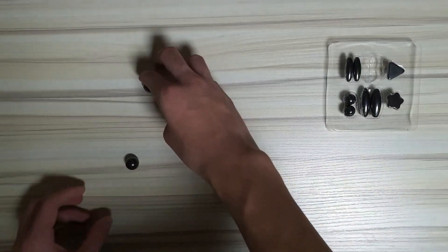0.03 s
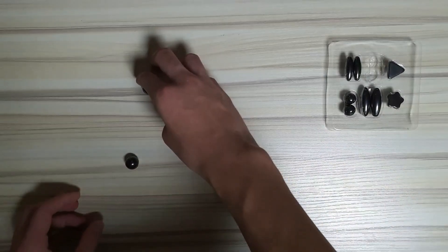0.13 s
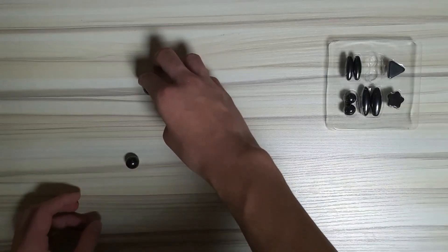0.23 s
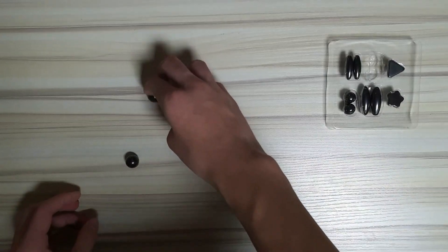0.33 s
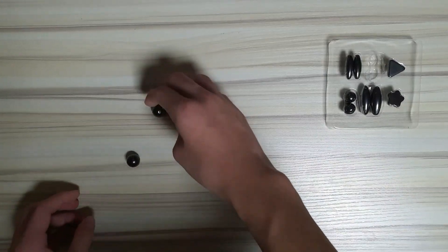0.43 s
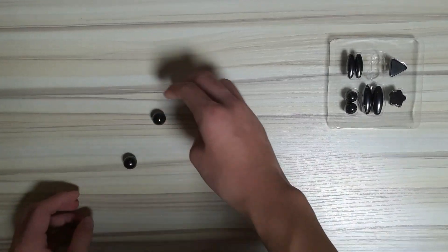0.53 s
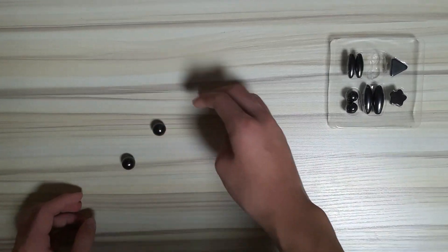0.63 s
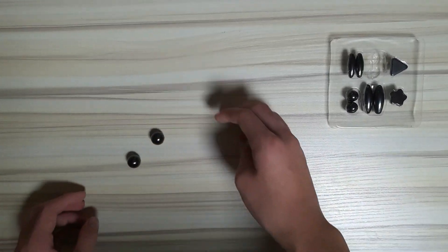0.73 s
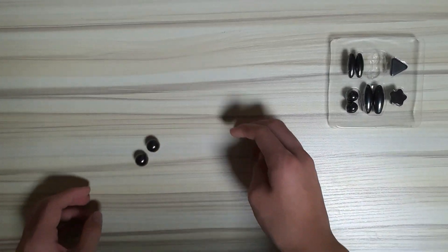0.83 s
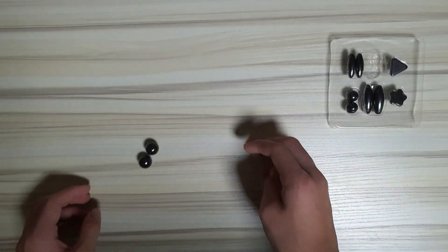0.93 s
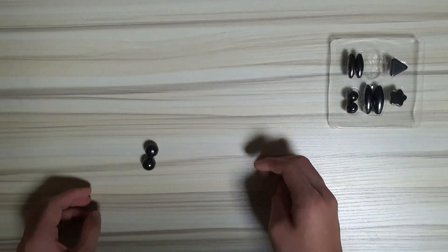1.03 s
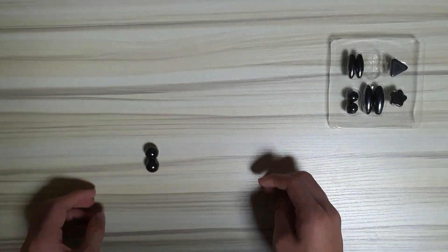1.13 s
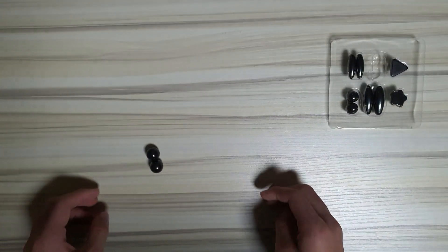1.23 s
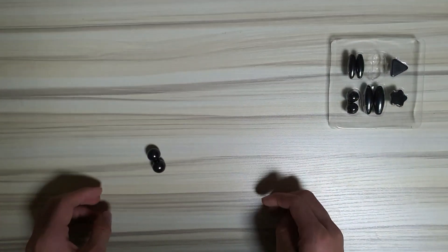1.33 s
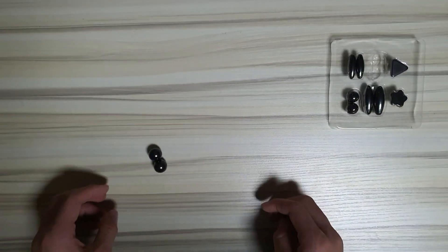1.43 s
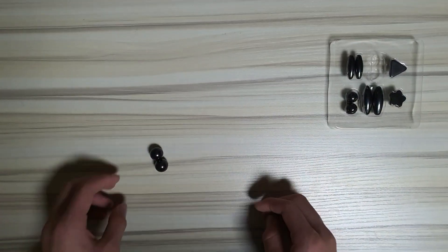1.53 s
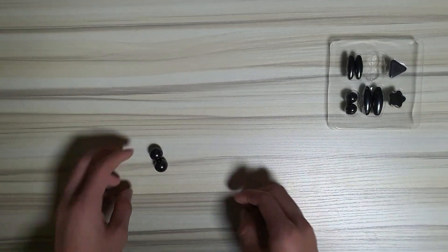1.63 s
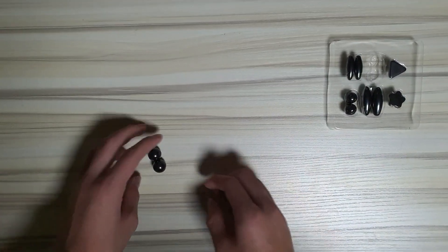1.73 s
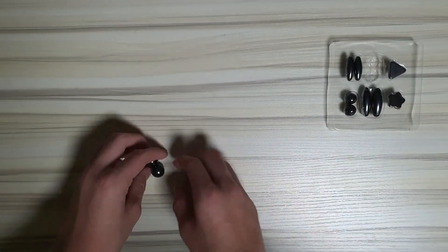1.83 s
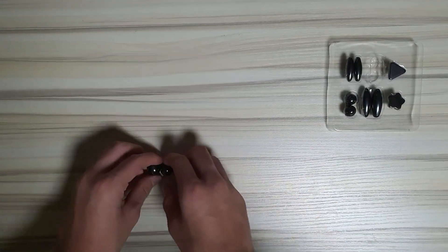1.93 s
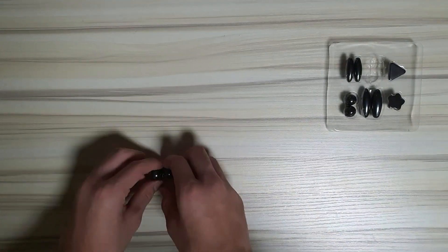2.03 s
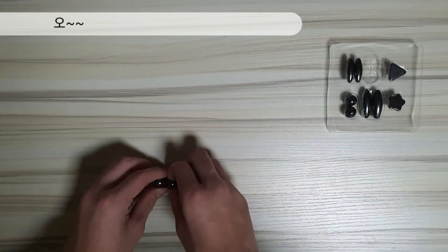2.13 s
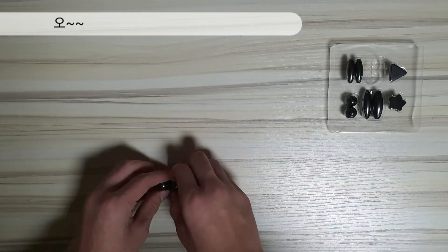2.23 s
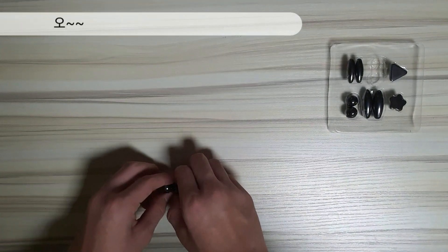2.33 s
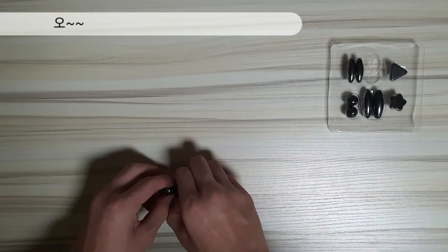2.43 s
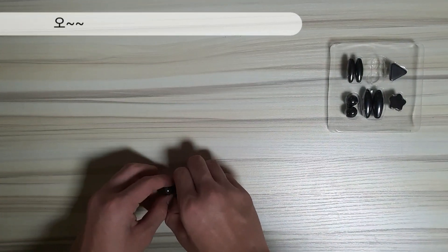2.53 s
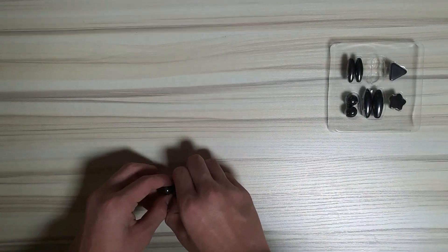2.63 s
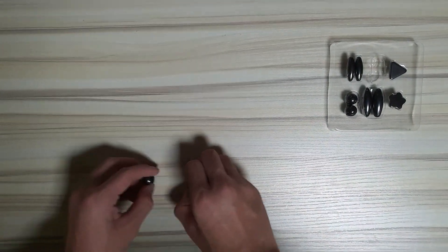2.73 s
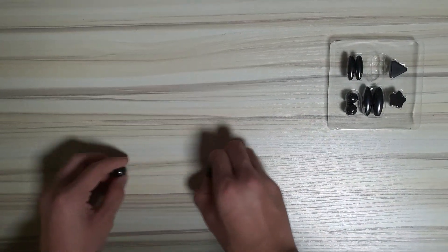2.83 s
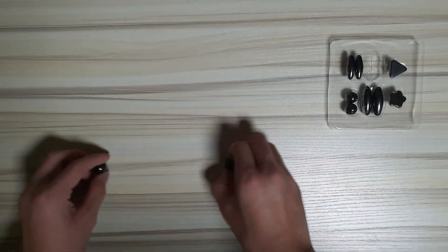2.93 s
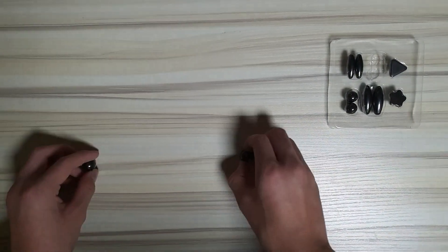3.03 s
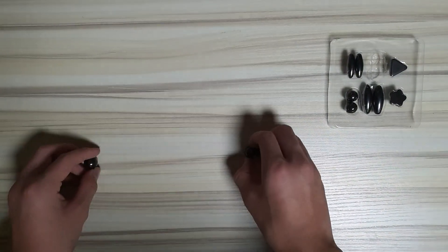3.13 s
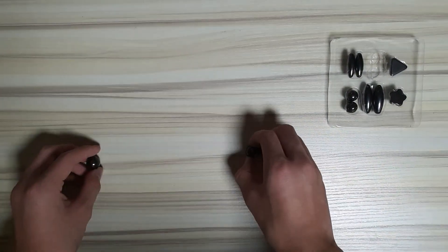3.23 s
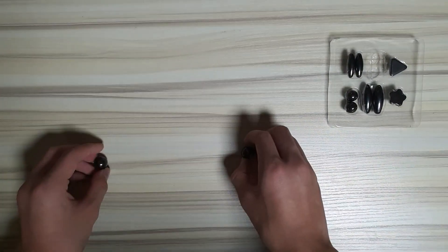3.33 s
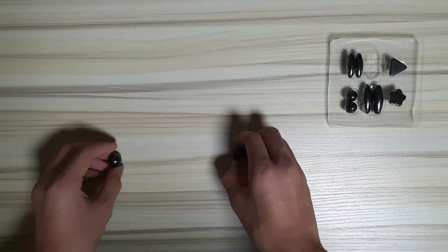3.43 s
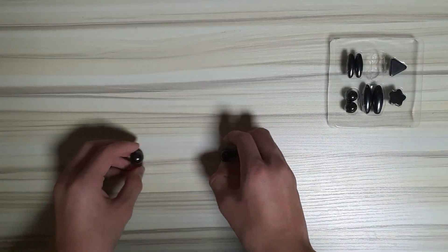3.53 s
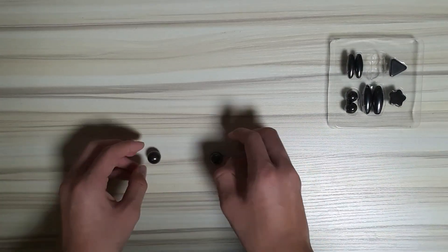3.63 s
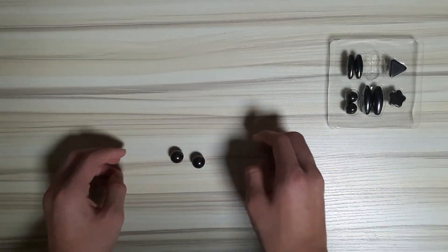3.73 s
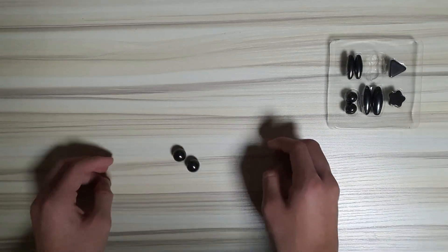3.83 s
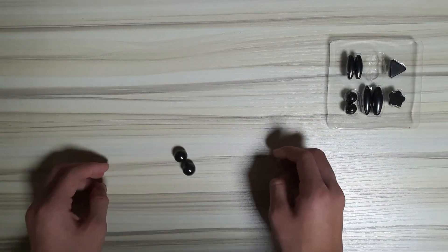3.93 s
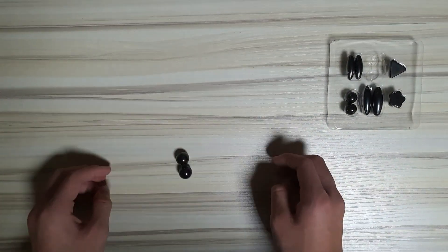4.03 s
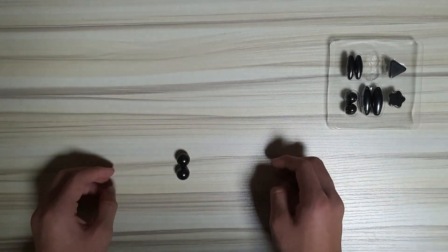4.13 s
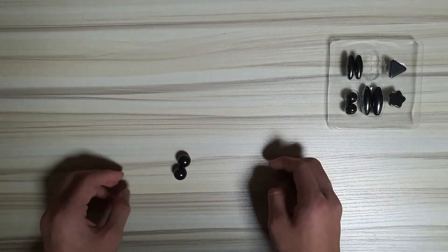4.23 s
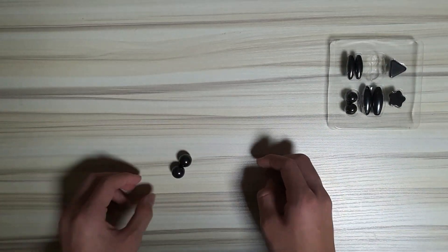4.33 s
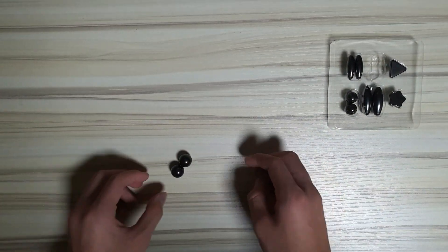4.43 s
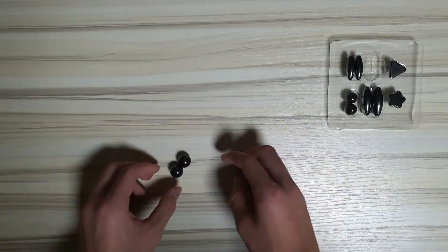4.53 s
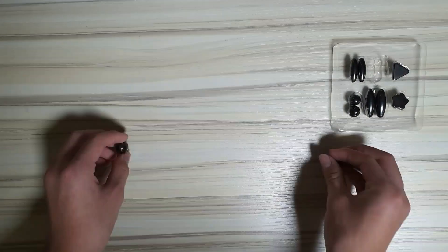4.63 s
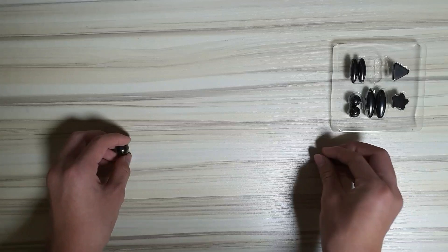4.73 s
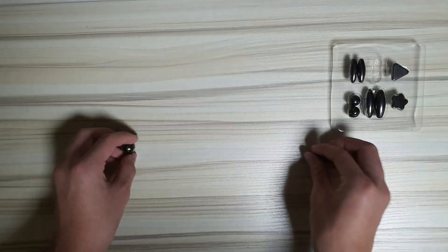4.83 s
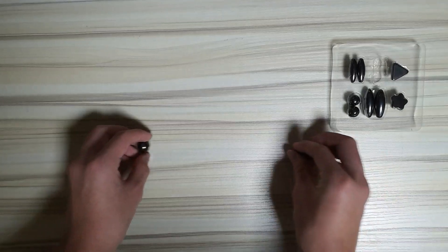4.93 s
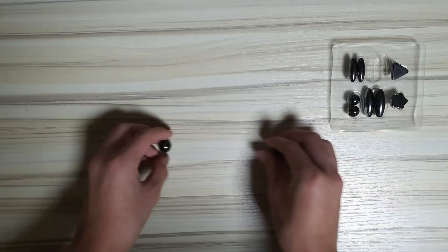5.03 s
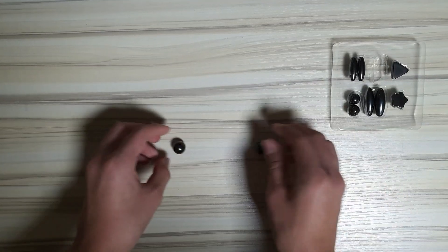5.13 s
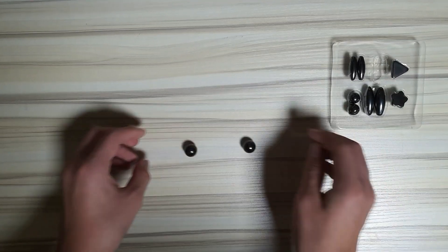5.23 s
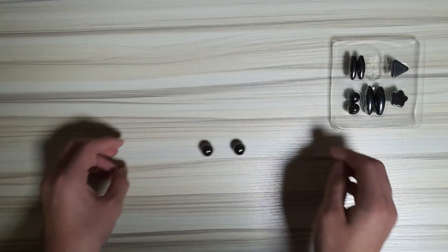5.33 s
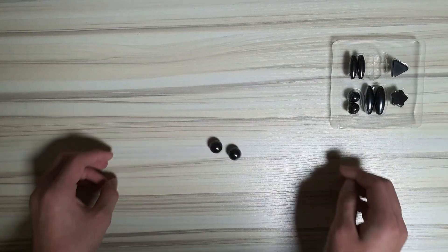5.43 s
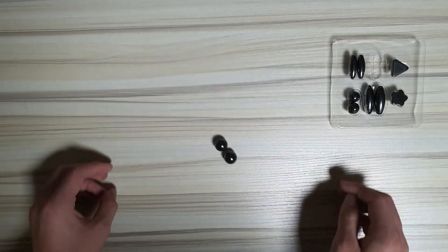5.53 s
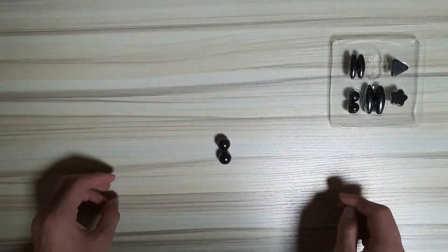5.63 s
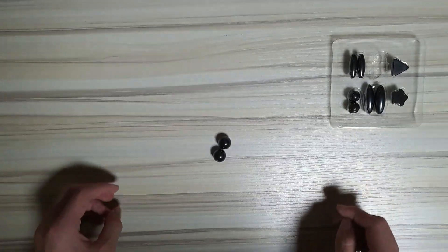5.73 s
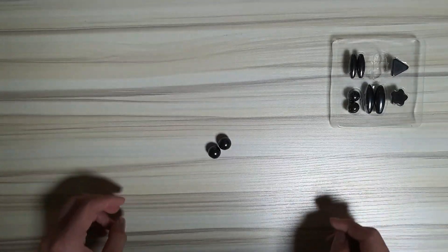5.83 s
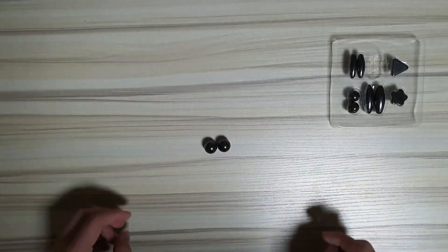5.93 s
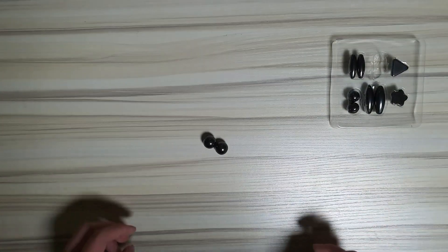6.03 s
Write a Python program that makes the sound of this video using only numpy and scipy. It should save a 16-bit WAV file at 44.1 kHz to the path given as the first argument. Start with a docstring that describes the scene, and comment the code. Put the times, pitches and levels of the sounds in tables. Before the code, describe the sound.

A small, bare, quiet room, heard close over a wooden table. From 0 to 0.6 seconds, skin brushes and fingertip scuffs sound on the wood. At about 0.65 a magnet rolls with small dull knocks; from 0.93 hard, bright clacks come ever faster, merging into a rising buzz that weakens and stops around 1.4. Soft rubs follow at 1.9 to 2.3, a very faint, thin squeak near 2.6, a knock at 2.8 and more hand sliding to 3.4. At 3.55 a knock and rolling start the second throw; clacks from 3.88 tighten into another buzz until about 4.5. Knocks and a soft rising rub follow, with a momentary dip at 4.76. A firm knock at 5.15 starts the third throw: rolling, clacks from 5.5, then a brighter buzz with a narrow ringing tone, climbing to the end just after 6.

```python
"""In a small, bare room, two polished oval magnets are tossed three times onto a wooden table.
Bursts of noise make the clacks: the pair rebounds ever faster until they merge into a rising buzz.
Noise and tiny bumps fed through the resonances of the wood make the rolls, knocks and sliding hands.
Between throws, hands pick the pair up and pull it apart, with soft rubs and a faint squeak."""
import sys
import numpy as np
from scipy import signal
from scipy.fft import rfft, irfft
from scipy.io import wavfile

SR = 44100
rng = np.random.default_rng(int(sys.argv[2]) if len(sys.argv) > 2 else 0)


def unload_wav(signal):
    """Save mono or channel-first audio to the path in sys.argv[1] as 16-bit WAV at rate SR, clipped to [-1, 1]."""
    wavfile.write(
        sys.argv[1],
        SR,
        np.round(np.clip(np.atleast_2d(signal).T, -1, 1) * 32767).astype(np.int16),
    )


N = 268304
MS = 1e-3  # one millisecond, in seconds
TAPS = 8192  # length of the long filters, in samples
HZ = np.fft.rfftfreq(TAPS, 1 / SR)
TIME = np.arange(N) / SR

# How the table top answers hard contact, without its sharp resonances.
# Each row: frequency in Hz, level in dB.
WOOD = [(15, -63.5), (25, -25), (60, -18.5), (139, -22), (286, -6.5), (438, -7.5), (529, -5), (879, -8.5),
        (978, -7.5), (1060, -9.5), (1390, -9.5), (2130, -7.5), (3930, -28.5), (7090, -33), (15000, -57.5)]
# How the table top answers soft skin. Each row: frequency in Hz, level in dB.
SKIN = [(24, -62.5), (40, -18.5), (169, -18.5), (313, -3), (466, -6), (541, 0.5), (866, -5.5), (980, -9.5),
        (1390, -16.5), (1570, -12), (1820, -18.5), (2450, -21.5), (3220, -32), (6780, -45.5),
        (15000, -64.5)]


def gain_of(db):
    """Turns decibels into a factor."""
    return 10 ** (np.asarray(db) / 20)


def evened(x):
    """Scales a sound to an average (rms) level of 1."""
    return x / np.sqrt(np.mean(x ** 2) + 1e-20)


def read(points, hz):
    """Reads a table between its points, on a log-frequency axis."""
    f, value = np.transpose(points)
    return np.interp(np.log(hz + 1), np.log(f + 1), value)


def through(x, response):
    """Sends a sound through a response (convolution) and keeps at most the scene's length."""
    return signal.fftconvolve(np.atleast_2d(x), np.atleast_2d(response), axes=1)[:, :N]


def band(x, hz, kind, order=2):
    """Keeps only part of the frequencies (Butterworth filter)."""
    return signal.sosfilt(signal.butter(order, hz, kind, fs=SR, output="sos"), x)


def peaks(rows):
    """Adds up resonance humps in dB, each given as (Hz, width in Hz, dB)."""
    return sum(db / (1 + (2 * (HZ - hz) / width) ** 2) for hz, width, db in rows)


def ringing(db):
    """Makes a response of energy 1 that starts at once and has the given spectrum."""
    log_gain = np.log(gain_of(np.maximum(db, -100)))
    mirrored = np.r_[log_gain, log_gain[-2:0:-1]]
    response = np.fft.ifft(np.exp(np.conj(signal.hilbert(mirrored)))).real
    return response / np.linalg.norm(response)


def colourless(ring):
    """Keeps only the delays of a response: it spreads a click in time without colouring it."""
    size = ring.shape[-1]
    angle = np.angle(np.fft.rfft(ring, 2 * size))
    spread = np.fft.irfft(np.exp(1j * angle))[..., :size]
    return spread / np.linalg.norm(spread, axis=-1, keepdims=True)


def impulses(times, sizes):
    """Places smooth, band-limited impulses at exact times between samples."""
    out, at = np.zeros(N), np.asarray(times)[:, None] * SR
    index = at.astype(int) + np.arange(-8, 9)
    pulses = np.asarray(sizes)[:, None] * np.sinc(index - at)
    np.add.at(out, np.clip(index, 0, N - 1), pulses)
    return out


def wander(size, step_s):
    """Draws a slow random curve, with a new value every step and straight lines between."""
    at = np.arange(size) / SR / step_s
    return np.interp(at, np.arange(256), rng.standard_normal(256))


def add(mix, s, sound):
    """Mixes a sound in at time s."""
    at = round(s * SR)
    sound = sound[:, max(-at, 0):]
    part = mix[:, max(at, 0):][:, :sound.shape[1]]
    part += sound[:, :part.shape[1]]


def room(x, wet_db, echo_db, smear_ms, direct=1):
    """Adds a few slightly smeared reflections and a diffuse tail; the bass is much alike in both ears."""
    # Early reflections. Each row: delay in ms, left level in dB, right level in dB, before echo_db.
    echoes = [(1.2, -6, -12), (2.1, -9, -8), (5.3, -13, -7), (6.3, -2.5, -9), (8.8, -9, -14),
              (11.6, -5, -6), (16.6, -12, -12), (23, -13, -13)]
    # How fast the tail fades. Each row: frequency in Hz, time to fall by 60 dB in seconds.
    fade_times = [(200, 0.25), (530, 0.17), (1400, 0.19), (3700, 0.21), (8000, 0.26), (16000, 0.19)]
    # How alike the tail is in both ears. Each row: frequency in Hz, likeness from -1 to 1.
    likeness = [(100, 0.87), (350, 0.99), (600, 0.85), (1000, -0.35), (2000, 0.16), (4000, 0.035),
                (16000, 0.69)]
    t = np.arange(SR // 2) / SR
    hz, frames, z = signal.stft(rng.standard_normal((2, len(t))), SR, nperseg=256)
    same = np.clip(read(likeness, hz), -1, 1)[:, None]
    z[1] = same * z[0] + np.sqrt(1 - same ** 2) * z[1]
    fade_db = -60 * frames / read(fade_times, hz)[:, None]
    tail = signal.istft(z * gain_of(fade_db), SR, nperseg=256)[1][:, :len(t)]
    tail *= 1 - np.exp(-t / 0.0044)  # the tail builds up over a few ms
    response = gain_of(wet_db) * tail / np.linalg.norm(tail[0])
    smear = np.exp(-t[:256] / (smear_ms * MS))
    for ms, *ears_db in echoes:
        smeared = colourless(rng.standard_normal((2, len(smear))) * smear)
        echo = band(smeared, 850, "highpass", order=1)
        place = response[:, round(ms * MS * SR):][:, :len(smear)]
        place += gain_of(np.c_[ears_db] + echo_db) * echo
    response[:, :np.size(direct)] += direct
    return through(x, response / np.linalg.norm(response[0]))


def wood(contact, place, ring=1.0, chance_db=1.5):
    """Response of the table top; each place on it favours other resonances, and a hand damps them."""
    # Resonances of the board, before the ring factor and a small random change.
    # Each row: frequency in Hz, width in Hz, height in dB.
    board_modes = [(204, 7, 13), (272.5, 16, 6.6), (316, 83, 5.7), (370, 23, 3.1), (523.9, 16, 7),
                   (557, 24, 11.9), (984.6, 44, 14.1), (1157.4, 52, 5.5), (1285, 26, 8), (1498.4, 55, 11.8),
                   (1650, 80, 3.5), (2098.4, 45, 10.9), (2145, 66, 3), (2510, 70, 1.7)]
    # Main resonances that depend on the place of contact. Each row: frequency in Hz, width in Hz.
    place_bands = [(550, 80), (985, 69), (1520, 110), (2130, 130)]
    modes = peaks((hz, width, db + chance_db * rng.standard_normal()) for hz, width, db in board_modes)
    favoured = peaks((hz, width, db) for (hz, width), db in zip(place_bands, place))
    return ringing(read(contact, HZ) + ring * modes + favoured)


def scatter(x, ring_ms=9, size=2048):
    """Bending waves cross the board and return from its edges, drawing a blow out into a dense ring."""
    fade = np.exp(-np.arange(size) / SR / (ring_ms * MS))
    return through(x, colourless(rng.standard_normal(size) * fade))


def friction(motions, contact, ring, bumps_per_s, grit, low_db, high_db):
    """Motion feeds tiny bumps and fine grit into the wood; level and ring shift from patch to patch."""
    split_hz, wide_hz, bass_hz = 1200, 800, 420
    patch_s, bump_s, bump_db = .06, .02, 1.6
    bumps = (rng.random(N) < bumps_per_s / SR) * rng.uniform(.5, 1, N) * rng.choice([-1, 1], N)
    force = evened(bumps) + grit * rng.standard_normal(N)
    # the bass comes straight from the board; higher up the room adds its reflections
    straight = band(force, wide_hz, "lowpass", order=4)
    upper = band(force, wide_hz, "highpass", order=4)
    drive = straight + room(upper, wet_db=13.0, echo_db=-2.5, smear_ms=0.061)
    bass_filter = signal.butter(3, bass_hz, fs=SR, output="sos")
    out = np.zeros((2, N))
    for start, level, bright_db, bass_db, place in motions:
        # each motion crosses another stretch of the grain
        at, size = rng.integers(N - 2 * SR), len(level)
        stretch = drive[:, at:at + TAPS + size]
        here, there = (through(stretch, wood(contact, place, ring))[:, TAPS:TAPS + size] for _ in range(2))
        share = (1 + np.tanh(2 * wander(size, patch_s))) / 2
        top = here + (there - here) * share
        low = evened(band(top, split_hz, "lowpass", order=4))
        high = evened(band(top, split_hz, "highpass", order=4))
        low = low + (gain_of(bass_db) - 1) * signal.sosfiltfilt(bass_filter, low)
        uneven = gain_of(bump_db * wander(size, bump_s))
        both = gain_of(low_db) * low + gain_of(high_db + bright_db) * high
        add(out, start, level * uneven * both)
    return out


def quiet(apart=0.98, level_db=-74):
    """Faint steady background of the room: shaped noise that differs partly between the ears."""
    # Shape of its spectrum. Each row: frequency in Hz, relative level in dB.
    hush = [(25, -22), (55, -8), (110, -15), (220, -16.5), (660, -29.5), (2100, -37), (3000, -39),
            (3520, -31), (4100, -40), (5000, -41), (16000, -45)]
    noise = apart * rng.standard_normal((2, N)) + rng.standard_normal(N)
    return gain_of(level_db) * evened(through(noise, ringing(read(hush, HZ))))


def squeak(waver_hz=45, squeak_db=-4):
    """A faint thin squeak while the fingers strain at the pair: one gliding, wavering line."""
    # Path of the squeak, before the waver and the shared squeak_db.
    # Each row: time in seconds, frequency in Hz, level in dB.
    path = [(2.51, 9450, -95), (2.56, 9800, -77), (2.61, 9980, -73), (2.645, 9880, -75.5),
            (2.665, 10020, -80), (2.705, 10100, -80), (2.73, 9820, -72), (2.76, 9600, -92)]
    s, hz, db = np.transpose(path)
    t = np.arange(s[0], s[-1], 1 / SR)
    turns = np.cumsum(np.interp(t, s, hz) + waver_hz * wander(len(t), .004)) / SR
    level = gain_of(squeak_db + np.interp(t, s, db))
    out = np.zeros((1, N))
    add(out, s[0], (level * evened(np.sin(2 * np.pi * turns)))[None])
    return out


def drags(width_hz=170):
    """A fingertip drags: skin slips at a loosely held rate that climbs as the finger tightens."""
    # Soft rising rubs. Each row: start in seconds, length in seconds, first slip rate in Hz,
    # last slip rate in Hz, level in dB before the swell and the room.
    rubs = [(3.364, .07, 835, 1150, -57), (4.911, 0.097, 698, 839, -44)]
    out = np.zeros((1, N))
    for start, length, first_hz, last_hz, db in rubs:
        size = round(length * SR)
        slips = evened(band(rng.standard_normal(SR), width_hz, "lowpass")[-size:])
        turns = np.cumsum(np.linspace(first_hz, last_hz, size)) / SR
        tone = evened(slips * np.sin(2 * np.pi * turns))
        add(out, start, (gain_of(db) * np.hanning(size) * tone)[None])
    return room(out, wet_db=-5, echo_db=-3, smear_ms=1.0)


def touches(touch_db=-10):
    """Soft fingertips load the table gradually: a short scuff that swells and dies."""
    # Each row: start in seconds, peak level in dB before touch_db, treble in dB against the peak,
    # time to swell in ms.
    fingers = [(0.432, -24, -44, 8), (0.478, -17.5, -33, 8), (1.907, -33, 1, 30.6), (2.233, -29, -25.5, 5)]
    scuff_colour = [(300, -13.0), (2000, 0.5), (4000, -10.5), (9000, -20.0), (15000, -40.0)]  # (Hz, dB)
    push, scuff = np.zeros(N), np.zeros(N)
    for s, db, treble_db, swell_ms in fingers:
        age = np.maximum(TIME - s, 0) / (swell_ms * MS)
        swell = (age * np.exp(1 - np.minimum(age, 60))) ** 2
        force = gain_of(db + touch_db) * swell * rng.standard_normal(N)
        push, scuff = push + force, scuff + gain_of(treble_db) * force
    board = through(push, wood(SKIN, place=(3, -3, 4, -2)))
    sound = board + through(scuff, ringing(read(scuff_colour, HZ)))
    return room(sound, wet_db=2, echo_db=2.0, smear_ms=0.93)


def stroke(start, length, db, bright_db, bass_db, *place):
    """A hand speeds up and slows down in one arch; table and room hold the sound a little longer."""
    tail_s, arch, t60_s = .3, .55, 0.31  # extra time, how pointed the swell is, how long it rings on
    t = np.arange(0, length + tail_s, 1 / SR)
    speed = np.maximum(np.sin(np.pi * np.minimum(t / length, 1)), 0) ** arch
    keep = gain_of(-60 / (t60_s * SR)) ** 2
    energy = signal.lfilter([1 - keep], [1, -keep], speed ** 2)
    return start, gain_of(db) * np.sqrt(energy), bright_db, bass_db, place


def rubbing():
    """Hands stroke the table: skin slides over it in many fine slips."""
    # Each row: start in seconds, length in seconds, level in dB before the friction settings,
    # brightness in dB, bass in dB, then height in dB of each of the four place bands.
    hand_strokes = [(-0.06, 0.16, -34, -2, -2.5, 1.5, 0, 5.5, -4),
                    (0.181, 0.045, -44.5, -4.5, -8, 2, -12, -1, -2),
                    (0.252, 0.079, -59.5, -26, 2, 2.0, -1.0, -1.0, -4.0),
                    (0.374, 0.055, -51.5, -24, -26, -2, -6.0, 6, 1.0),
                    (0.425, 0.055, -36, -6.5, -18, -1, 2.0, 5, 10),
                    (0.468, 0.05, -31, 2, -2.5, 2, 1.5, 3.5, 8),
                    (0.535, 0.18, -49, -12, -4, 2, -5.0, 2.5, -1.0),
                    (1.849, 0.1, -68, 6, 15, -2.0, -1.0, 5.0, 0.0),
                    (1.897, 0.084, -57.5, 5, -2, -2.0, -2.0, 5.0, 0.0),
                    (1.974, 0.073, -40.5, 8.5, 10.5, -2.0, 4.5, 2, -3.0),
                    (2.05, 0.061, -44, -12, 6.5, 1.0, 1.0, 3.0, -3.0),
                    (2.151, 0.11, -43.5, -11, 0.5, 3.5, -1.0, 3.0, -6),
                    (2.41, 0.049, -59.5, -15, 4.5, 5.0, -4.0, 9.0, -2.0),
                    (2.852, 0.17, -42.5, 3.5, -4, 0.5, -2, 3, -2),
                    (2.933, 0.18, -34.5, 5.5, 1.5, -0.5, -4.0, 1.0, -4.0),
                    (3.228, 0.071, -52.5, -13.5, -3.5, -1, -4.0, -1.0, -3.0),
                    (3.405, 0.2, -44.5, -10.5, -3.5, 0.0, -1, -1.0, -2.0),
                    (4.899, 0.13, -47.5, 3.5, 1, -2.0, -1.5, -2, -3.0)]
    motions = [stroke(*row) for row in hand_strokes]
    return friction(motions, SKIN, ring=0.81, bumps_per_s=710, grit=0.79, low_db=-2.0, high_db=-5.5)


def knocks(knock_db=17.0, bounce_ms=12, bounce_db=-9, count=3):
    """A magnet hits the table, with a few small bounces and a tick of contact; soft bumps lack treble."""
    # Each row: start in seconds, peak level in dB before knock_db, treble in dB against the peak,
    # hardness as top frequency in Hz, then height in dB of each of the four place bands.
    hits = [(0.651, -22.5, -38, 1800, 3.5, -6.0, -1.0, 3), (0.708, -23, -41, 1200, 2.0, -4.0, 2.0, -1.0),
            (0.737, -23.5, -29, 1800, 4, 1.0, 1.0, -2.0), (0.866, -24.5, -27, 3000, -5.0, -2, 2.0, -3),
            (2.803, -13.5, -11.5, 7050, 2.0, -13.5, -3.0, 2.5),
            (3.55, -12, -20.5, 7000, -2, -0.5, -2, -1.0), (3.749, -16, -2.5, 9000, -3, -1, 6, -1),
            (3.904, -14, 0.5, 9000, 2.0, -3, 2, 2), (3.907, -12, 5, 9000, 2, -3.0, 3.0, 4),
            (4.56, -12.5, -11, 9000, -2.0, -1.5, 3.0, 0.5), (4.59, -15, -8, 9000, -2.0, 4, 2.0, -1.0),
            (4.831, -13.5, -30.5, 6970, -1.5, -2.5, -2, -1),
            (5.148, -7.5, -3.5, 9000, -5.5, -1.0, 1.0, 1.0), (5.512, -11.5, -9, 9000, -3, -8, 3.0, -0.5),
            (5.754, -8.5, -2, 9000, -4.5, -6, 4, -1)]
    # Colour of the contact tick. Each row: frequency in Hz, relative level in dB.
    tick_colour = [(300, -27), (1500, -1), (2400, 12.5), (3600, -13), (7000, -27), (15000, -54)]
    out, tick = np.zeros((1, N)), ringing(read(tick_colour, HZ))
    for s, db, treble_db, top_hz, *place in hits:
        board = wood(WOOD, place)
        for k in range(count):
            contact = (k == 0) * gain_of(treble_db) * tick  # only the first blow ticks
            blow = band(board + contact, min(top_hz, SR / 3), "lowpass")
            when = s + k * bounce_ms * MS * rng.uniform(0.56, 1.4)
            add(out, when, gain_of(db + knock_db + k * bounce_db) * blow[None])
    return room(scatter(out, ring_ms=4.2), wet_db=5.5, echo_db=-0.5, smear_ms=0.49)


def roll(start, length, rise_s, db, change_db, bright_db, bass_db, *place):
    """A roll gets going, gains or loses speed steadily, then dies away with the room."""
    tail_s, fade_db_per_s = .3, 208
    t = np.arange(0, length + tail_s, 1 / SR)
    slope_db = change_db * np.minimum(t / length, 1) - fade_db_per_s * np.maximum(t - length, 0)
    return start, np.minimum(t / rise_s, 1) * gain_of(db + slope_db), bright_db, bass_db, place


def rolling():
    """The oval magnets roll, slide or spin, wobbling over the grain of the wood."""
    # Each row: start in seconds, length in seconds, rise in seconds, level in dB before the friction
    # settings, change over the roll in dB, brightness in dB, bass in dB, then height in dB of each
    # of the four place bands.
    rolls = [(0.644, 0.26, 0.0083, -42.5, 8, -7.5, -8, 0.5, -1.5, 1.0, -4.5),
             (0.911, 0.4, 0.014, -33, -1, 6, 2.5, -4.0, 4.5, 3.0, -2),
             (3.556, 0.35, 0.018, -30.5, -3.5, 1, 0.5, 0.5, 0, 2.5, 0),
             (3.884, 0.074, 0.0036, -29.5, -8.5, 14.5, 6.5, 3.0, -1, 2.5, 4.0),
             (3.948, 0.61, 0.015, -29, -10.5, 4.5, 3, 1.5, -0.5, 2.0, -2),
             (4.565, 0.055, 0.011, -32.5, 3, 6, -4.5, -1.5, -1, 1.5, 0.0),
             (4.976, 0.16, 0.028, -38.5, 2, 3, 3, -3, 1, 0.5, -3),
             (5.178, 0.22, 0.01, -30.5, -8.5, -1, 0.5, -3.5, -3.5, -3.0, 1.5),
             (5.401, 0.31, 0.066, -35.5, 3, 6, 6, 0.0, -5.5, 2.0, -0.5),
             (5.723, 0.093, 0.0075, -33.5, 1.5, 15.5, 7, -1.5, -5.5, 2.5, -3.5),
             (5.797, 0.26, 0.0075, -36.5, -1.5, -1, 6, -1.0, -1, 0.0, -5)]
    motions = [roll(*row) for row in rolls]
    return friction(motions, WOOD, ring=0.98, bumps_per_s=600, grit=0.85, low_db=-1.35, high_db=-8.0)


def rebounds(start, rest_s, loss, wide_ms, wide_s, jitter_ms=.02, last_gap_ms=.62):
    """Times and flight times of one run: each rebound loses the same share of speed, so gaps shrink.

    The first ones fly wide, where the pull is weak, and take longer."""
    age, times, gaps = 0, [], []
    for chance in rng.standard_normal(1000):
        gap = loss * (rest_s - age) + wide_ms * MS * np.exp(-age / wide_s)
        if gap < last_gap_ms * MS or start + age > TIME[-1]:
            break
        times.append(start + age)
        gaps.append(gap)
        age += gap + jitter_ms * MS * chance
    return np.array(times), np.array(gaps)


def clatter(times, sizes, memory=.95, apart=1.15, even=.6, size=256):
    """Each clack is a hard-edged burst, gone in about a millisecond; they drift as the pair spins."""
    peak_ms, rise_ms, hold_ms, ring_ms = .68, .15, .55, .5
    ms = np.arange(size) / SR / MS - peak_ms
    shape = np.exp(np.minimum(ms, 0) / rise_ms - np.maximum(ms - hold_ms, 0) / ring_ms)
    grain = rng.standard_normal((1000, 3, size))
    grain = signal.lfilter([1], [1, -memory], grain, axis=0)  # one clack is much like the last
    # the first noise is shared, the other two belong to one ear each
    spectra = rfft(np.sign(grain[:, :1] + apart * grain[:, 1:]) * shape)
    # partly flatten each burst's spectrum, so every clack sounds evenly noisy
    bursts = irfft(spectra / (abs(spectra) + 1e-9) ** even)
    bursts /= np.linalg.norm(bursts, axis=2, keepdims=True)
    out = np.zeros((2, N))
    for s, strength, burst in zip(times, sizes, bursts):
        add(out, s, strength * burst)
    return out


def magnets(clack_db=13, settle_ms=2.6, ring_gain_db=-1, left_db=(.5, 1.2, .8), uneven_db=.5):
    """Hard faces meet: single clacks, then a buzz that weakens and gains a narrow ring as it tightens."""
    # Single clacks, while the pair still tumbles and flies wide, or is caught.
    # Each row: time in seconds, level in dB before clack_db.
    clacks = [(0.9298, -4), (0.9363, -8), (0.9646, -4), (0.9917, -2.5), (1.0107, -3), (1.0268, -5),
              (1.042, -4), (1.0543, -4), (1.0656, -2.5), (3.8824, -2), (3.9197, -6), (3.9481, -3),
              (3.9792, -4), (3.9936, -2), (4.015, -3), (4.0267, -4.5), (4.0437, -3.5), (4.0539, -3.5),
              (4.0673, -3), (4.0783, -4), (4.0898, -5), (4.1014, -6), (4.5574, -17), (5.4986, -5),
              (5.5399, -2.5), (5.5598, -2), (5.5895, -2), (5.6109, -4), (5.6266, -4.5), (5.6435, -6),
              (5.6557, -6), (5.6699, -5), (5.6817, -4), (5.6931, -5.5)]
    # The run of rebounds, one row a throw. Each row: start in seconds, time to rest in seconds, share
    # of speed lost per rebound, extra flight time of the first wide rebounds in ms, its decay in seconds.
    throws = [(1.0767, .33735, .02053, 2.53, .0647), (4.1098, .404, .01202, 3.3, .141),
              (5.7043, .5316, .01258, 2.63, .069)]
    # How hard they meet, one row a throw. Each row: level at full speed in dB before a small random
    # change, flight time that gives half that speed in ms.
    forces = [(18, 20.7), (16.5, 17.4), (12, 10.5)]
    # Tone of a clack, which changes with where the pair lies, one table a throw.
    # Each row: frequency in Hz, level in dB.
    tones = [
        [(880, -42), (1500, -7), (1810, -24), (2120, -5), (2560, -4), (3590, -0.5), (4500, -4), (5280, -1.5),
         (6100, -1), (7000, 2), (8000, 3), (9000, -4.5), (9800, -0.5), (10900, -2), (11900, -1), (13800, -3.5),
         (15800, -9.5)],
        [(880, -43), (1500, 4), (1980, -5), (2660, -3.5), (2950, -8.5), (3500, -5.5), (5020, -4.5),
         (5700, -3.5), (7800, 1), (9010, -3), (10900, -2), (11600, -2.5), (12400, -2.5), (15800, -8)],
        [(880, -57), (1500, 13), (1810, 0), (2080, 7.5), (2250, 0), (2490, 5), (2690, 3), (3410, 6), (4080, 1),
         (4730, 3), (6800, 7), (8320, 9), (10500, 6), (13500, 4.5), (14900, 4), (15800, -4)],
    ]
    # The pair's sharper resonances, one table a throw.
    # Each row: frequency in Hz, width in Hz, left height in dB, right height in dB.
    sharp_rings = [
        [(6800, 350, 3, 2), (7900, 550, 3, 0), (9800, 500, 3, 1), (11400, 500, 5, 0), (15350, 600, 2, 4)],
        [(6630, 400, 3.5, -0.5), (7720, 500, 3, -2), (8300, 300, 3, -1), (9000, 400, -2, 0),
         (11620, 450, 6, -1), (15500, 500, 2.5, 3)],
        [(6970, 500, 4.5, 0), (9000, 450, -4, 0), (9850, 600, 2.5, -1.5)],
    ]
    # The narrow ring that comes out as the pair settles, one row a throw.
    # Each row: frequency in Hz, width in Hz, gain in dB before ring_gain_db.
    settling = [(7900, 500, -3), (7530, 600, -23.5), (7290, 250, 12.5)]
    out = np.zeros((2, N))
    s, db = np.transpose(clacks)
    every_throw = zip(throws, forces, tones, sharp_rings, settling, left_db)
    for throw, (full_db, half_ms), tone, rings, (ring_hz, width, ring_db), pan_db in every_throw:
        times, gap = rebounds(*throw)
        speed = gap / (gap + half_ms * MS)  # a longer flight lands harder, up to a limit
        sizes = speed * gain_of(full_db + uneven_db * rng.standard_normal(len(times)))
        mine = abs(s - times[0]) < 1  # the single clacks of this throw
        hits = clatter(np.r_[s[mine], times], np.r_[gain_of(db[mine] + clack_db), sizes])
        # mainly short flights feed the narrow ring
        settled = impulses(times, sizes / (1 + (gap / (settle_ms * MS)) ** 4))
        resonator = signal.iirpeak(ring_hz, ring_hz / width, SR)
        ring = gain_of(ring_db + ring_gain_db) * signal.lfilter(*resonator, settled)
        ears = []
        for ear in range(2):
            humps = peaks((hz, wide, ear_db[ear]) for hz, wide, *ear_db in rings)
            ears.append(ringing(read(tone, HZ) + humps))
        pan = gain_of([[pan_db], [-pan_db]])
        out += through(band(hits + ring, 2200, "highpass"), ears) * pan
    # below 4700 Hz the magnets send little straight at the listener
    direct = band(signal.unit_impulse(64), 4700, "highpass")
    return room(out, wet_db=-3.6, echo_db=-3, smear_ms=.3, direct=direct)


def scene():
    """Mixes magnets, table and background; all but the background dip briefly in level, then recover."""
    dip_start_s, dip_length_s, dip_db = 4.76, 0.04, -47
    table = rolling() + rubbing() + knocks() + touches() + drags() + squeak()
    table = table * gain_of([[-.5], [.5]])  # slightly to the right
    level_db = np.interp(TIME - dip_start_s, [-.005, .005, dip_length_s], [0, dip_db, 0])
    return (magnets() + table) * gain_of(level_db) + quiet()


def record(dry):
    """Stops peaks at full scale, then removes what lies above about 16 kHz."""
    low_pass = signal.firwin(511, 16150, window=("kaiser", 9), fs=SR)
    return signal.oaconvolve(np.clip(dry, -1, 1), low_pass[None], "same")


dry = scene()
out = record(dry)
unload_wav(out)
```